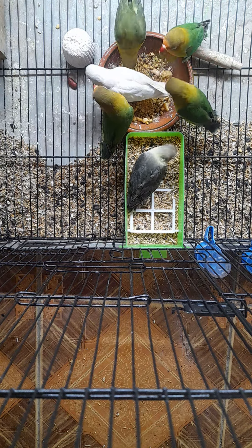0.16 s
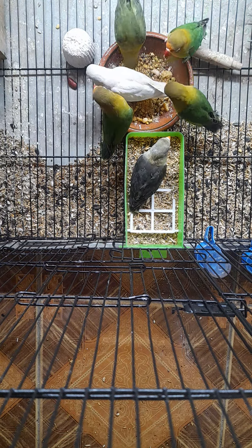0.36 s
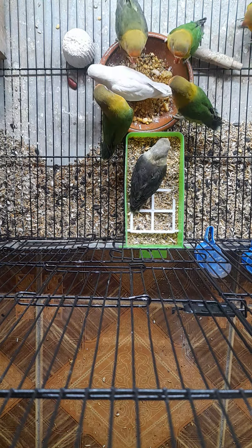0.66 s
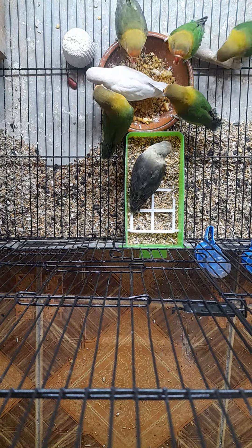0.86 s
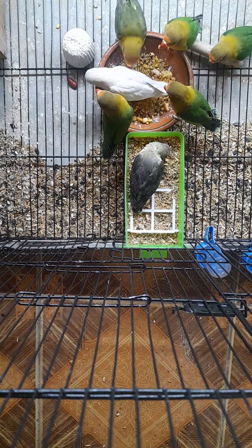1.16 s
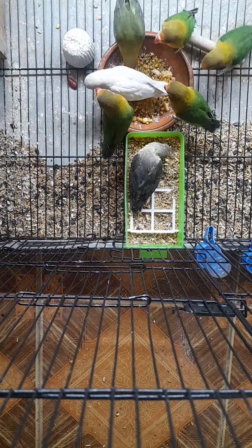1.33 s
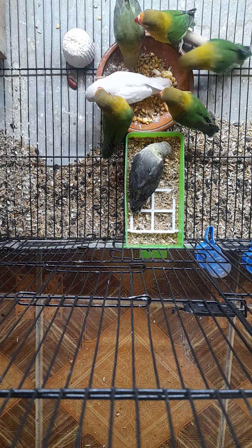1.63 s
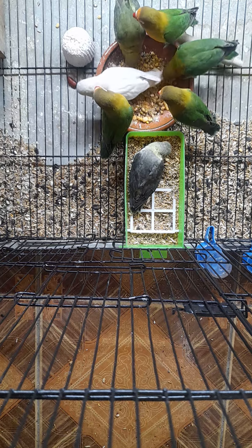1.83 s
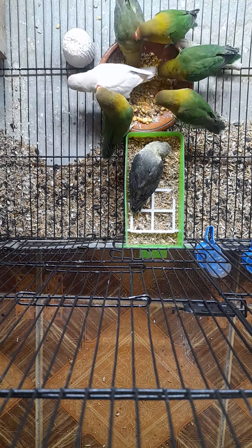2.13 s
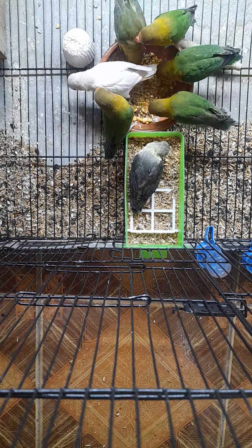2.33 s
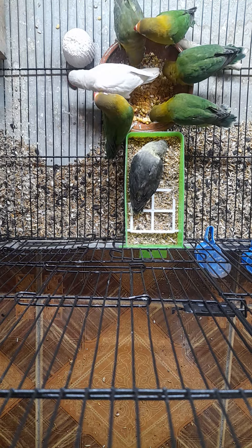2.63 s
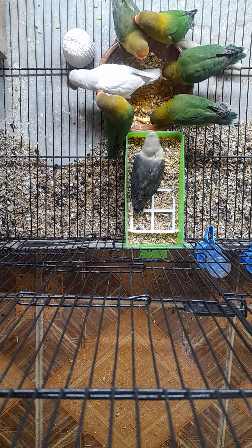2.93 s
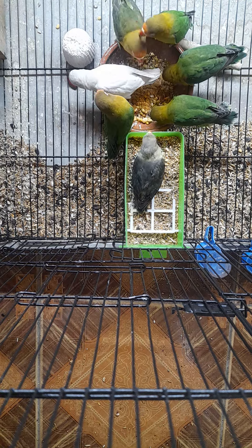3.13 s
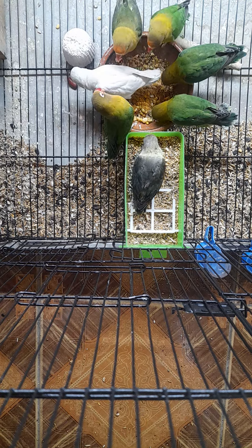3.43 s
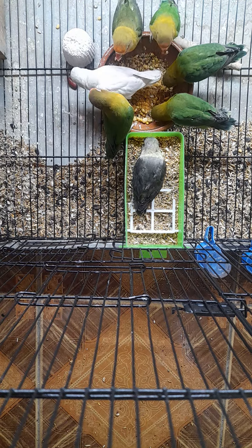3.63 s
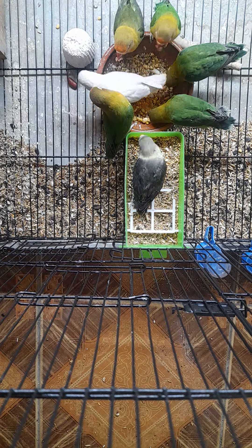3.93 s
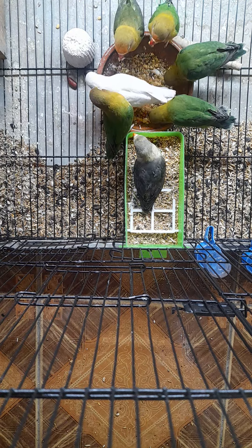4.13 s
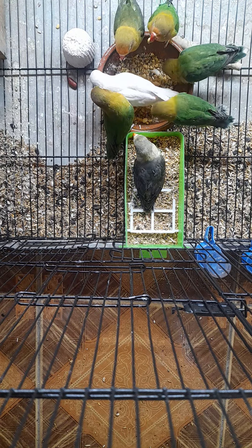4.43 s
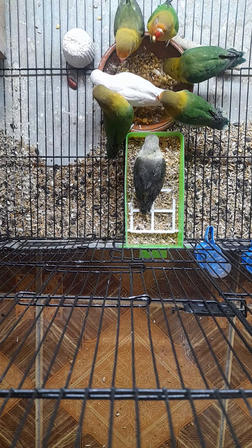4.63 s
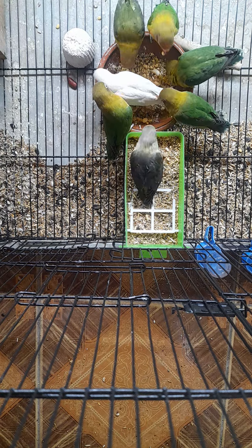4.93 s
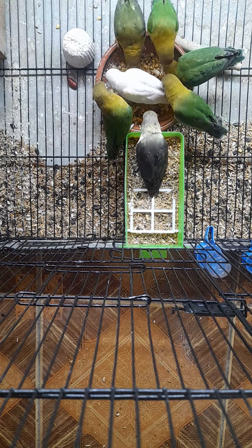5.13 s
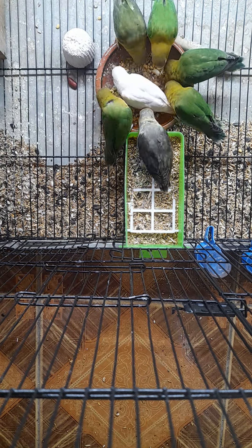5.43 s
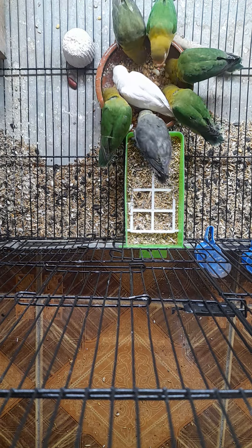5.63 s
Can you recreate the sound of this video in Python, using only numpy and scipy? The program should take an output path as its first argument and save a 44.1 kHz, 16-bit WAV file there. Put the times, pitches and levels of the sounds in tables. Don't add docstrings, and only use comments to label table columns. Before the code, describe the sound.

A hard-walled room with a steady low motor hum, thin whine, rumble, hiss and soft draught on the microphone; a faint distant bearing whistle comes and goes until about 2.6 s. Small parrots sit mostly to the right. A short harsh squawk and level call open at 0 s, followed by light grainy wing flutters and a soft chirp from 0.2 to 0.5 s. Tiny ticks fall near 0.9 and 1.1 s, nasal, burred chirps at 1.2-1.3 s, softer chatter around 1.6 s and weak notes near 2.1 and 2.5 s. From 2.67 to 3.2 s, piercing, rasping screeches swoop up and down, the loudest around 3.05 s, ringing briefly in the room. The background dips afterwards. Faint falling chirps follow at 3.7-3.9 s, a low knock at 4.55 s and quiet chirps near 4.9 s. Sharp squawks return at 5.2-5.3 s, then soft notes and bright, loud pips around 5.63 s.

```python
import sys
import numpy as np
from scipy import signal
from scipy.fft import rfft, irfft
from scipy.io import wavfile
from scipy.ndimage import uniform_filter1d, map_coordinates

SR = 44100
rng = np.random.default_rng(int(sys.argv[2]) if len(sys.argv) > 2 else 0)


def transcribe(signal):
    frames = np.atleast_2d(signal).T
    limited = np.clip(frames, -1, 1)
    pcm = np.round(limited * 32767).astype(np.int16)
    wavfile.write(sys.argv[1], SR, pcm)


def voltage_ratio(level):
    return 10 ** (np.asarray(level, float) / 20)


N = 254456

# freq_hz, gain_db
SHADE_RESPONSE = [(1000, 14), (2500, 7.5), (4600, 3.5), (5700, -4), (6800, -24), (8300, -42), (9700, -45),
                  (11000, -15), (14000, 14)]


def rms_one(x):
    return x / np.sqrt(np.mean(x ** 2) + 1e-20)


def in_time(rows, t):
    s, *columns = np.transpose(rows)
    return [np.interp(t, s, c) for c in columns]


def at_hz(points, hz):
    freq_hz, value = np.transpose(points)
    return np.interp(np.log(hz), np.log(freq_hz), value)


def band(x, low_hz, high_hz):
    sos = signal.butter(2, [low_hz, min(high_hz, .45 * SR)], "band", fs=SR, output="sos")
    return signal.sosfilt(sos, x)


def coloured(x, points):
    hz = np.fft.rfftfreq(len(x), 1 / SR) + 1
    return irfft(rfft(x) * voltage_ratio(at_hz(points, hz)), len(x))


def drift(rate_hz):
    r = np.exp(-2 * np.pi * rate_hz / SR)
    noise = rng.standard_normal(N + SR)
    return rms_one(signal.lfilter([1], [1, -2 * r, r * r], noise)[SR:])


def tone(hz):
    return np.sin(2 * np.pi * np.cumsum(hz) / SR)


def panned(x, right_db):
    return x * voltage_ratio([[-right_db / 2], [right_db / 2]])


def swells(rows, rise_db_per_s, fall_db_per_s):
    t = np.arange(N) / SR
    levels = []
    for s, length, db in rows:
        before, after = np.maximum(s - t, 0), np.maximum(t - s - length, 0)
        levels.append(db - rise_db_per_s * before - fall_db_per_s * after)
    return np.max(levels, axis=0)


def calls():
    # freq_hz, gain_db
    call_colour = [(1500, 8.5), (2500, 0.5), (4200, 1.5), (6500, 1), (7400, 4), (8700, -5.5), (10100, 6),
                   (11400, -2.5), (12800, 0.5), (14500, -18.5), (17000, -20)]
    out, direct, t = np.zeros((2, N)), np.zeros((2, N)), np.arange(N) / SR
    warble_hz = 150.06
    flutter = tone(warble_hz * voltage_ratio(2.9 * drift(40)))
    grain = drift(350)
    swing = .75 * flutter + .4 * grain
    burr = np.clip(grain[::-1], -3, 1.5)
    rasp = rms_one(band(band(rng.standard_normal(N), 2500, 7400), 2500, 7400))
    for rows, bird in syllables():
        start_s, end_s = rows[0][0], rows[-1][0]
        span = slice(int(start_s * SR), int(end_s * SR))
        hz, level_db, warble = in_time(rows, t[span])
        warble = np.clip(warble, 0, .5)
        hz = hz * (1 + warble * swing[span])
        phase = 2 * np.pi * np.cumsum(hz) / SR
        burr_db = 2.2 * np.minimum(warble / .03, 1) * burr[span]
        voice = voltage_ratio(at_hz(call_colour, hz) + burr_db) * np.sin(phase)
        for k in range(2, 8):
            heard = k * hz < .45 * SR
            throat_db = bird["overtones_db"] - bird.get("fall_db", 2.1) * (k - 2.5)
            throat_db += bird.get("even_db", 0) * (0.5 - k % 2)
            grain_db = np.sqrt(k * 2) * np.roll(burr_db, 40 * k)
            overtone_db = throat_db + at_hz(call_colour, k * hz) + grain_db
            voice += heard * voltage_ratio(overtone_db) * np.sin(k * phase + k * k)
        throb = voltage_ratio((40 * np.minimum(warble, .13) + bird.get("throb_db", 0)) * flutter[span])
        rasp_gain = voltage_ratio(bird.get("rasp_db", -12.5)) * np.sqrt(10 * warble)
        voice = throb * (voice + rasp_gain * rasp[span])
        attack, release = (t[span] - start_s) / bird["attack_s"], (end_s - t[span]) / .002
        edge = np.clip(np.minimum(attack, release), 0, 1)
        placed = panned(voltage_ratio(level_db - 6.5) * edge * voice, bird["right_db"])
        out[:, span] += placed
        direct[:, span] += voltage_ratio(bird["direct_db"]) * placed
    return out, direct


def syllables():
    # time_s, pitch_hz, level_db, warble_share
    screech_calls = [
        [(.022, 3950, -22.5, 0.015), (.03, 3950, -17, .01), (.036, 3850, -17.5, 0.0089),
         (.043, 3000, -18.5, 0.012), (.049, 3950, -15.5, 0.0098), (.058, 4020, -17.5, 0.0046),
         (.064, 3960, -22.5, .005)],
        [(2.679, 2700, -13.5, .03), (2.685, 3750, -16.5, 0.065), (2.698, 4400, -10.5, 0.13),
         (2.709, 4700, -14.5, .12), (2.714, 6150, -10, 0.037), (2.722, 6100, -16, 0.059),
         (2.74, 5300, -26, .15)],
        [(2.74, 5300, -15.5, 0.14), (2.757, 4300, -21, 0.045), (2.774, 3800, -19.5, 0.078),
         (2.783, 2696, -23.5, 0.045), (2.789, 2330, -29.5, .03), (2.796, 2350, -17.5, 0.046),
         (2.801, 3500, -24, .03)],
        [(2.94, 2250, -30, .04), (2.962, 2600, -24.5, .04), (2.972, 2750, -15, 0.013), (2.977, 3900, -12, 0.03),
         (2.983, 4500, -13, 0.027), (2.99, 7100, -15.5, .03), (2.998, 7300, -30, 0.035),
         (3.012, 7000, -32.5, 0.076)],
        [(3, 4400, -25.5, 0.1), (3.01, 3800, -23.5, 0.07), (3.02, 2600, -15, 0.06), (3.028, 2700, -26, 0.039),
         (3.034, 3744, -16, 0.0093), (3.049, 3926, -2.5, 0.011)],
        [(3.125, 2370, -21.5, 0.031), (3.14, 3900, -18, 0.055), (3.148, 5300, -14, 0.056),
         (3.16, 6300, -31, 0.066), (3.185, 4590, -15.5, .13)],
    ]
    # time_s, pitch_hz, level_db, warble_share
    later_calls = [
        [(5.195, 4280, -20, .05), (5.202, 4080, -19, .06), (5.205, 6010, -20, 0.036), (5.213, 6220, -17, 0.027),
         (5.215, 5670, -17.5, 0.055), (5.225, 4240, -14.5, 0.095)],
        [(5.225, 3085, -15.5, 0.017), (5.243, 3234, -21, .025), (5.259, 3300, -15, 0.025),
         (5.262, 3593, -12.5, 0.044), (5.275, 3826, -25, .05), (5.285, 3983, -20, .08),
         (5.298, 4004, -23, 0.067)],
        [(5.384, 2346, -35, .005), (5.4, 2292, -26, .005), (5.42, 2390, -33, 0.038),
         (5.435, 2580, -25.5, 0.034), (5.455, 2656, -26.5, 0.035), (5.475, 2794, -24.5, 0.044),
         (5.49, 2800, -35, .03)],
    ]
    # overtones_db, fall_db_per_overtone, even_db, throb_db
    call_throats = [(-5.5, 3, -1.5, -0.7), (-8, 3, -7, 2.5), (-13.5, 5, -4.5, 5), (-9, 3, 0.5, 4),
                    (-14, 1, -6, -0.5), (-16.5, 2, -1, -4), (-13, 3, 2.5, 1), (-8, 9.5, -5, -0.5),
                    (-7.5, 0.5, -4.5, 0)]
    # start_s, length_s, from_hz, to_hz, level_db
    clear_notes = [
        (2.822, 0.027, 4169, 4246, -15),
        (3.043, .02, 4830, 5270, -24.5),
        (3.883, 0.036, 2417, 2500, -52.5),
        (5.48, 0.018, 4340, 4350, -31),
        (5.495, .012, 4390, 4330, -29),
    ]
    # start_s, length_s, from_hz, to_hz, level_db
    pip_notes = [
        (3.05, 0.011, 3168, 3095, -14),
        (3.061, 0.01, 4386, 4300, -8.5),
        (5.619, 0.0063, 4200, 4660, -15),
        (5.626, 0.0043, 4900, 4840, -5),
        (5.635, 0.01, 4600, 4530, -10),
    ]
    # start_s, length_s, from_hz, to_hz, level_db
    nasal_notes = [
        (.325, 0.03, 3440, 3234, -33),
        (1.221, 0.039, 3520, 3430, -24.5),
        (2.057, 0.01, 2235, 2320, -37.5),
        (2.134, 0.039, 2777, 2442, -31),
        (2.497, 0.0096, 1873, 2100, -26.5),
        (4.566, 0.054, 1980, 2030, -41.5),
        (5.18, 0.012, 3680, 3380, -31),
        (5.191, 0.0087, 2916, 2274, -25.5),
    ]
    # start_s, length_s, from_hz, to_hz, level_db
    burred_notes = [(.2, 0.032, 6210, 5530, -40), (1.29, 0.049, 4810, 4552, -25),
                    (2.157, 0.034, 5070, 4680, -26), (2.506, 0.028, 6140, 6176, -24),
                    (2.8, 0.026, 3630, 4026, -23.5), (3.095, 0.017, 4160, 4324, -21),
                    (5.4, .03, 5150, 5250, -32.5), (5.525, 0.014, 4124, 4266, -32.5),
                    (5.274, 0.018, 5286, 5170, -17), (5.506, 0.0221, 3475, 3580, -29.5),
                    (5.614, 0.0061, 3360, 3540, -29), (5.641, 0.0046, 5060, 6280, -12.5),
                    (5.651, 0.025, 6300, 5590, -19)]
    # start_s, length_s, from_hz, to_hz, level_db
    harsh_notes = [(0, 0.017, 4107, 3800, -14), (1.212, .011, 4360, 3990, -32),
                   (5.228, .028, 5300, 5000, -24), (5.196, .008, 2325, 2027, -29.5),
                   (1.253, 0.033, 5460, 5100, -28.5), (1.898, 0.014, 4080, 4560, -44),
                   (2.671, 0.009, 2610, 2566, -17.5), (3.066, 0.019, 4820, 6200, -20.5),
                   (3.09, 0.035, 5460, 4800, -25), (4.586, 0.057, 4750, 4700, -47.5),
                   (4.61, 0.063, 2543, 3100, -40)]
    # start_s, length_s, from_hz, to_hz, level_db
    held_notes = [(1.568, 0.029, 2950, 2540, -29.5), (1.592, 0.024, 3470, 3395, -25.5),
                  (1.636, 0.031, 2936, 2700, -25), (3.677, 0.018, 3320, 2805, -36),
                  (3.692, 0.013, 3380, 3440, -34.5), (3.71, 0.0216, 2860, 2525, -35.5),
                  (3.755, 0.033, 2710, 2363, -40.5), (4.891, 0.0203, 2600, 2355, -35.5),
                  (4.926, 0.026, 3236, 3130, -33), (4.953, 0.012, 2650, 2360, -28),
                  (4.985, 0.026, 3200, 2610, -36)]
    # start_s, length_s, from_hz, to_hz, level_db
    drop_notes = [
        (1.558, 0.013, 4700, 2980, -45),
        (1.582, 0.0074, 2600, 1640, -38.5),
        (1.616, .015, 2900, 1607, -35.5),
        (1.666, 0.0126, 2500, 1520, -34.5),
        (3.735, .013, 2505, 1690, -46),
        (3.794, 0.014, 2420, 1715, -40),
        (4.882, 0.0097, 4260, 2754, -41),
        (4.911, 0.0083, 2360, 1790, -43),
        (4.968, 0.014, 2440, 1465, -37),
    ]
    short_notes = (
        notes(clear_notes, warble=.011, bend=0.82, swell_db=-2.5, arch_db=-3.5, overtones_db=-10.5,
              even_db=-0.5, right_db=21.5, direct_db=0.7, attack_s=0.0023)
        + notes(pip_notes, warble=0.02, bend=0.31, swell_db=-3.0, arch_db=-1, overtones_db=-25,
                right_db=23.0, direct_db=-5.0, attack_s=0.0036)
        + notes(nasal_notes, warble=0.0653, bend=.9, swell_db=3.5, arch_db=2.0, overtones_db=-5.0,
                right_db=17.5, direct_db=-3.5, attack_s=0.0031)
        + notes(burred_notes, warble=0.065, bend=0.695, swell_db=1.5, arch_db=-6.0, overtones_db=-9,
                right_db=17.5, direct_db=-3.6, attack_s=0.0027)
        + notes(harsh_notes, warble=0.14, bend=0.87, swell_db=-7.5, arch_db=-2.0, overtones_db=-13.5,
                right_db=18.5, direct_db=-4.0, attack_s=0.004)
        + notes(held_notes, warble=0.053, bend=1.1, swell_db=-2.0, arch_db=-1.5, overtones_db=-22,
                fall_db=2.0, rasp_db=-21, right_db=14.5, direct_db=-6, attack_s=0.0029)
        + notes(drop_notes, warble=0.029, bend=0.98, settle=1.8, swell_db=-8, arch_db=-3.0,
                overtones_db=-19.5, rasp_db=-31, right_db=17.0, direct_db=-4.0, attack_s=0.0014))
    long_calls = []
    for rows, (db, fall, even, throb) in zip(screech_calls + later_calls, call_throats):
        long_calls.append((rows, dict(overtones_db=db, fall_db=fall, even_db=even, throb_db=throb,
                                      right_db=16.0, direct_db=-2.0, attack_s=0.0011)))
    return short_notes + long_calls


def notes(rows, warble, bend, swell_db, arch_db, settle=1, **voice):
    u = np.linspace(0, 1, num=13)
    glide = 1 - (1 - u ** bend) ** settle
    out = []
    for s, length, from_hz, to_hz, db in rows:
        hz = from_hz * (to_hz / from_hz) ** glide
        level_db = db + swell_db * (u - .5) - arch_db * (2 * u - 1) ** 2
        out.append((np.transpose([s + length * u, hz, level_db, warble + 0 * u]), voice))
    return out


def wings():
    # freq_hz, gain_db
    feather_response = [(880, -39), (1500, -11.5), (3120, 0.5), (4210, -4.5), (4910, 2.5), (5300, -1.5),
                        (6060, 2.5), (7350, 2), (8100, -2.5), (9820, -8.5), (12000, -9.5), (13400, -24),
                        (15000, -25.5)]
    # start_s, length_s, level_db
    wing_beats = [
        (.19, 0.018, -32.5),
        (.318, 0.034, -31.5),
        (.432, 0.0014, -35),
        (.468, 0.023, -34),
    ]
    level = voltage_ratio(swells(wing_beats, rise_db_per_s=1200, fall_db_per_s=902))
    noise = rms_one(coloured(rng.standard_normal(N), feather_response))
    return panned(level * voltage_ratio(drift(130)) * noise, 13.1)


def ticks():
    # start_s, peak_db, ring_hz
    knock_events = [
        (0.856, -30.5, 6130),
        (1.056, -28, 3460),
        (1.991, -41, 9980),
        (4.548, -24.5, 1490),
        (5.364, -47, 12400),
    ]
    out, age = np.zeros(N + 600), np.arange(600) / SR
    for s, peak_db, hz in knock_events:
        start = round(s * SR)
        ring = np.sin(2 * np.pi * hz * age) * np.exp(-age * hz / 0.48)
        out[start:start + 600] += voltage_ratio(peak_db) * ring
    return panned(out[:N], 2.2)


def at_ports(x):
    # time_s, lag_ms
    left_lag = [(0, 0.48), (1.4, 0.47), (1.8, -0.39), (3.3, -0.15), (5.2, -0.31), (5.77, -0.82)]
    n = np.arange(N)
    lag_ms, = in_time(left_lag, n / SR)
    late = n - lag_ms * SR / 1000
    return np.array([map_coordinates(coloured(x[0], SHADE_RESPONSE), [late], order=3), x[1]])


def room(x):
    # freq_hz, t60_s
    decay_t60 = [(1500, 0.32), (4000, 0.39), (8000, 0.27), (15000, 0.31)]
    tail_db, early_db = -5, -11
    age = np.arange(int(.6 * SR)) / SR
    white, edges = rng.standard_normal((2, len(age))), np.geomspace(800, 18000, 8)
    tail = 0
    for low, high in zip(edges, edges[1:]):
        t60_s = at_hz(decay_t60, np.sqrt(low * high))
        tail = tail + band(white, low, high) * voltage_ratio(-60 * age / t60_s)
    tail *= np.clip((age - .006) / 0.022, 0, 1)
    tail *= voltage_ratio(tail_db) / np.sqrt(np.sum(tail ** 2, axis=1, keepdims=True))
    for side, lags_s in enumerate(rng.uniform(.002, .022, (2, 6))):
        echoes = voltage_ratio(early_db - 200 * lags_s) * rng.choice([-1, 1], 6)
        tail[side, (lags_s * SR).astype(int)] += echoes
    return signal.fftconvolve(x, tail, axes=1)[:, :N]


def background():
    # freq_hz, density_db_per_hz
    rumble_spectrum = [(59, -31), (100, -3), (174, -6.5), (215, 3.5), (301, 0), (439, -7), (530, -3.5),
                       (550, -3), (639, -4), (1060, -15), (1210, 2), (1390, -20.5), (2000, -14),
                       (2600, -40.5), (4400, -120)]
    # freq_hz, density_db_per_hz
    hiss_spectrum = [(880, -30), (1500, -10), (2310, -11.5), (3120, 3), (3610, -4.5), (4480, -2),
                     (7160, -8.5), (12500, -10.5), (14300, -16), (15500, -34.5)]
    # time_s, gain_db
    recorder_gain = [(0, 5), (.05, 0), (.5, 2), (1.1, 0), (1.44, 4.5), (1.7, 7.5), (2.2, 6), (2.67, 7.5),
                     (2.78, 2), (3.1, -1), (3.5, -4), (4.19, -4.5), (4.42, 3.5), (5.26, 6.5), (5.37, 8.5),
                     (5.77, 5)]
    # start_s, length_s, level_db
    thump_swells = [
        (0, .005, -40),
        (.42, 0.036, -36.5),
        (1.96, 0.008, -35),
        (5.37, 0.023, -45.5),
    ]
    # start_s, length_s, level_db
    hiss_swells = [
        (0, 0.026, -46),
        (1.69, 0.082, -59.5),
        (2.6, 0.087, -58.5),
        (4.42, 0.065, -62.5),
        (5.26, 0.043, -52.5),
        (5.37, 0.22, -52),
    ]
    # start_s, length_s, level_db
    gust_swells = [
        (.05, .37, -56),
        (1.69, .01, -69),
        (2.17, .01, -57),
        (2.65, 0.0097, -51),
        (4.42, 0.055, -50),
        (4.65, 0.046, -50.5),
        (5.26, 0.12, -46),
    ]
    gain_db, = in_time(recorder_gain, np.arange(N) / SR)
    hum_db = -52.5 + gain_db
    rumble_db = np.maximum(-45.5 + 0.9 * gain_db, swells(thump_swells, rise_db_per_s=130, fall_db_per_s=40))
    hiss_db = np.maximum(-69 + gain_db, swells(hiss_swells, rise_db_per_s=69.5, fall_db_per_s=65.5))
    draught_db = np.maximum(-61.5 + 0.74 * gain_db, swells(gust_swells, rise_db_per_s=67, fall_db_per_s=72.0))

    hum_hz, whine_hz, whine_db = 75.7, 523.2, -11
    hum = np.sqrt(2) * voltage_ratio(hum_db) * tone(hum_hz + 1.2 * drift(3.2))
    whine = voltage_ratio(rumble_db + whine_db + 0.68 * drift(0.93)) * tone(whine_hz + 0.15 * drift(0.76))
    rumble = voltage_ratio(rumble_db - 4.0) * banded_noise(rumble_spectrum, patchy_db=1.37)
    hiss = voltage_ratio(hiss_db + 7) * banded_noise(hiss_spectrum, patchy_db=1.2)
    hiss[0] = coloured(hiss[0], SHADE_RESPONSE)

    gusts = rng.standard_normal((3, N))
    low_gusts = band(band(gusts[0] + 0.1 * gusts[1:], 45, 75.3), 45, 74.9)
    draught = voltage_ratio(draught_db + 1.5) * rms_one(low_gusts)
    draught += voltage_ratio(2 * draught_db + 52.0) * rms_one(band(gusts[1:], 87, 150))

    whistle_hz, whistle_db = whistle_course()
    whistle = voltage_ratio(whistle_db + 9.5 + 3 * drift(30)) * tone(whistle_hz + 8 * drift(32.6))
    return hum + whine + rumble + hiss + draught + panned(whistle, 5.0)


def whistle_course():
    # start_s, length_s, first_hz, level_db
    whistle_events = [
        (0.072, 0.83, 1284, -66.5),
        (0.872, 0.096, 1225, -64),
        (0.972, 0.45, 1222, -70.5),
        (1.346, 0.059, 1207, -54),
        (1.41, 0.23, 1201, -73),
        (1.711, 0.48, 1227, -66),
        (2.397, 0.25, 1264, -60),
    ]
    rest_hz, settle_s = 1207, 0.3
    t, hz, level_db = np.arange(N) / SR, np.full(N, float(rest_hz)), np.full(N, -120.)
    for s, length, first_hz, db in whistle_events:
        on = (t >= s) & (t < s + length)
        hz[on] += (first_hz - rest_hz) * np.exp((s - t[on]) / settle_s)
        level_db[on] = db
    return hz, 20 * np.log10(uniform_filter1d(voltage_ratio(level_db), size=1500))


def banded_noise(spectrum, patchy_db):
    # freq_hz, correlation
    side_likeness = [(60, 0.98), (180, 0.6), (550, 0.2), (1650, -0.19), (4970, 0.079), (15000, 0.21)]
    # freq_hz, lean_db
    left_lean = [(60, 7), (240, 1.5), (950, 2.5), (3770, -6.5), (15000, -15.5)]
    edges = np.geomspace(spectrum[0][0], spectrum[-1][0], 21)
    out, white, flicker = 0, rng.standard_normal((2, 2, N)), drift(26.0)
    for k, (low, high) in enumerate(zip(edges, edges[1:])):
        mid, side = band(white[k % 2], low, high)
        hz = np.sqrt(low * high)
        alike = np.clip(at_hz(side_likeness, hz), -1, 1)
        gain = voltage_ratio(at_hz(spectrum, hz) + patchy_db * np.roll(flicker, k * N // 21))
        stereo = np.sqrt(1 + alike) * mid + np.sqrt(1 - alike) * side * [[1], [-1]]
        out = out + panned(gain * stereo, -at_hz(left_lean, hz))
    return rms_one(out)


def scene():
    sung, direct = calls()
    feathers, knocks = wings(), ticks()
    near = at_ports(direct + voltage_ratio(-5.0) * feathers) + knocks
    reflected = room(at_ports(sung + feathers) + 1.7 * knocks)
    return near + reflected + background()


def band_limit(x):
    return signal.sosfilt(signal.butter(12, 15750, fs=SR, output="sos"), x)


def record(dry):
    top_cut = signal.cheby2(12, 50, 16100, fs=SR, output="sos")
    rounded = 1.5 * np.tanh(dry / 1.5)
    return band_limit(signal.sosfilt(top_cut, rounded))


dry = scene()
out = record(dry)
transcribe(out)
```